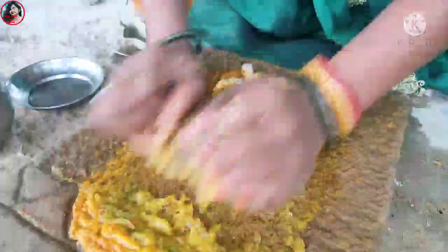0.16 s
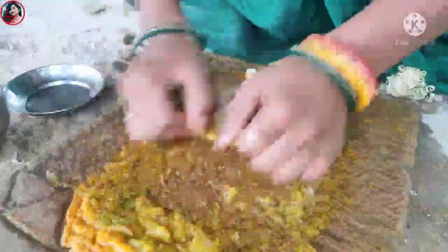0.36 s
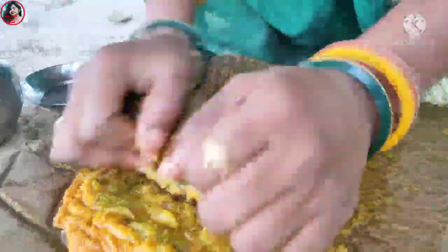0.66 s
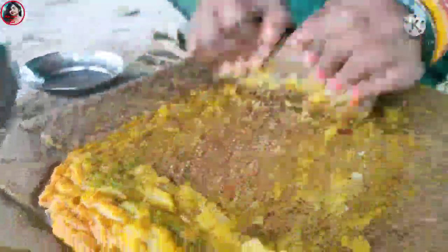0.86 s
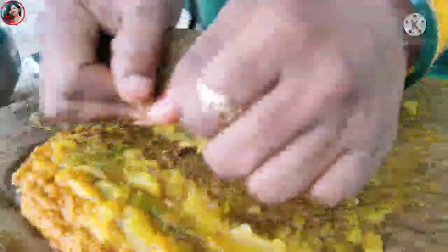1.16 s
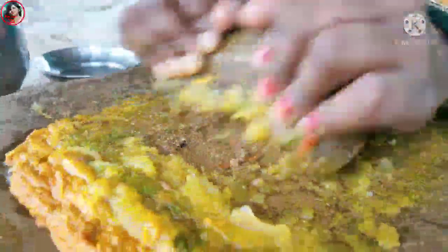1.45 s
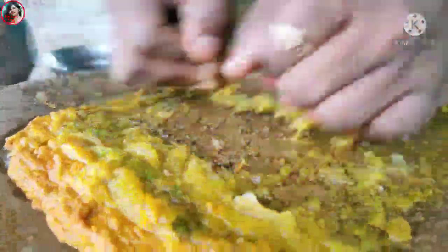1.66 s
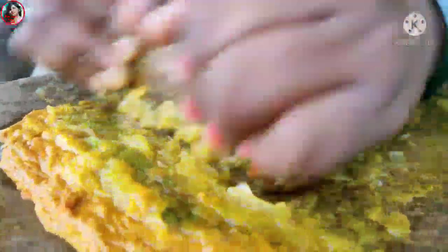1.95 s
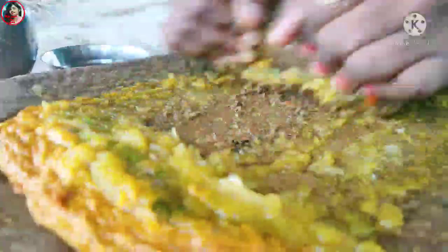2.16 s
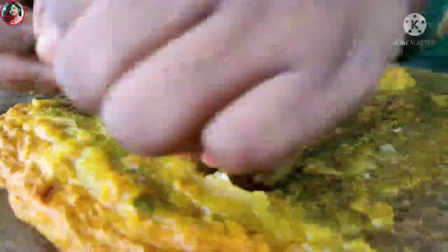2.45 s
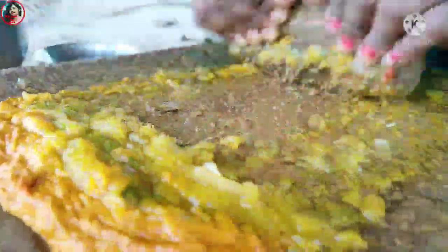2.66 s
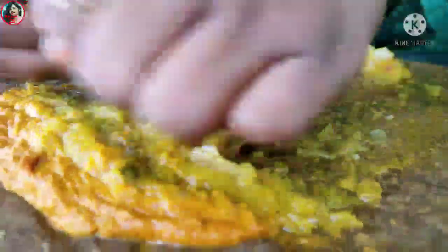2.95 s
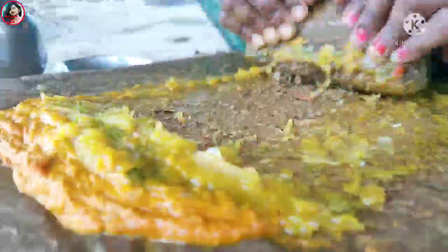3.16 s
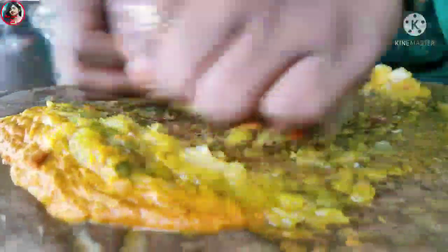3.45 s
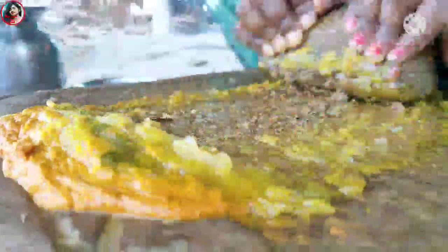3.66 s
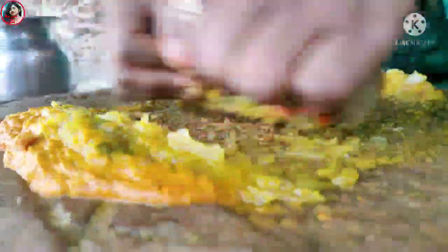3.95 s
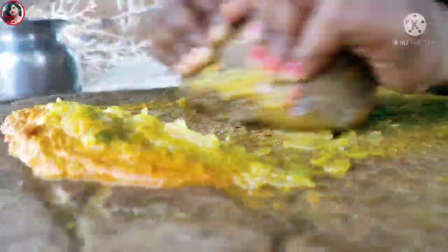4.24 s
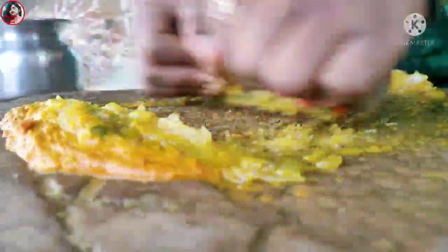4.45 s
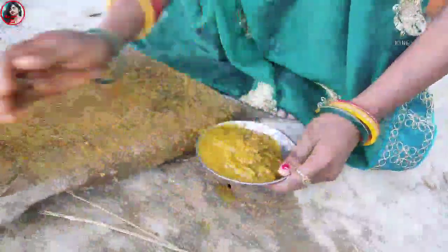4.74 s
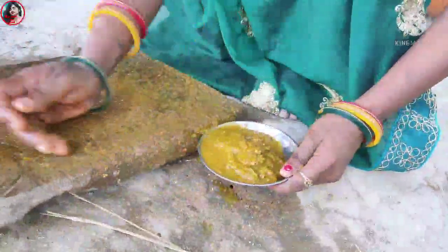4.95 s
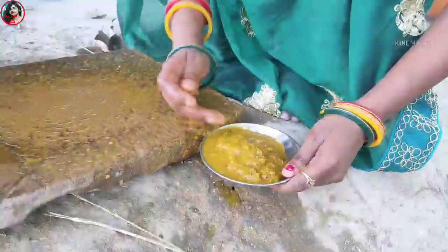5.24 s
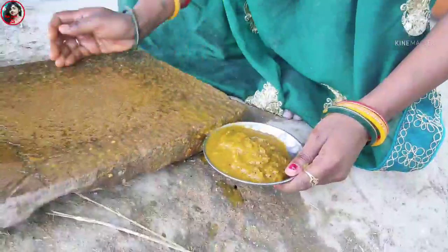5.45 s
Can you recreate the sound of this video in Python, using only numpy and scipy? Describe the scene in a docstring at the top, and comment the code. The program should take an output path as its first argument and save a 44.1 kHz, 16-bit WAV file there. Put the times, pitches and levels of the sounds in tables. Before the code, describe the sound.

From 0 to about 4.75 seconds a stone muller is pushed and pulled over wet spices on a stone slab, close and dry, about two full back-and-forth cycles or four strokes each second. Each stroke swells with low rumble, mid scrape, a short stony ring and bright wet crunch with fizzing paste. Early strokes have more husky crackle; later ones are heavier and scrapier. Seeds snap irregularly, strongly near 1.4, 2.4 and 3.65. Stone knocks stone at 1.7, hardest as a double hit at 2.8, and again at 3.3. Hoarse falling crow caws come from outside at the start, 0.5 to 1.4, 2.7 and 3.4, with open reflections. A far engine thuds softly, about 23 puffs per second, over low yard hush. Grinding cuts off; a soft low bump follows at 4.85, cloth rustles from 5, tiny whistles sound around 5.1 to 5.3, a faint knock at 5.14 and a weak caw at 5.5. Only the right channel sounds.

```python
"""In a house by a yard, a stone muller is pushed and pulled over a slab of wet spices, about twice a second.
Filtered grit follows each stroke as slab rumble, scrape, muller ring and wet crunch; noise bursts snap seeds.
Crows caw outside as hoarse harmonic stacks and a far one-cylinder engine thuds in low puffs over yard hush.
The grinding stops short, leaving a soft bump, rustling cloth, a faint knock and a small bird's whistles."""
import sys
import numpy as np
from scipy import signal
from scipy.fft import rfft, irfft
from scipy.io import wavfile
from scipy.ndimage import uniform_filter1d

SR = 44100
rng = np.random.default_rng(int(sys.argv[2]) if len(sys.argv) > 2 else 0)


def to_wav(s):
    """Save 16-bit WAV."""
    ch = np.atleast_2d(s).T  # columns
    pcm = np.round(np.clip(ch, -1, 1) * 32767)  # PCM
    wavfile.write(sys.argv[1], SR, pcm.astype(np.int16))


N = 247401  # length in samples


def amp(db):
    """Decibels to gain."""
    return 10 ** (np.asarray(db) / 20)


def unit(x):
    """Scales to rms 1."""
    return x / np.sqrt(np.mean(x ** 2) + 1e-20)


def add(mix, s, sound):
    """Mixes a sound in at time s; it may have begun before zero."""
    at = round(s * SR)
    sound = sound[max(-at, 0):]
    part = mix[max(at, 0):][:len(sound)]
    part += sound[:len(part)]


def arch(start_s, length_s, peak_share):
    """Swells from 0 to 1 and back, with its top at the given share of the length."""
    times = start_s + length_s * np.array([0, peak_share, 1])
    return np.sin(np.pi * np.interp(np.arange(N) / SR, times, [0, .5, 0]))


def wander(size, rate_hz):
    """Slow random drift of rms 1, with little movement above the given rate."""
    f = np.fft.rfftfreq(size, 1 / SR)
    spectrum = rfft(rng.standard_normal(size))
    return unit(irfft(spectrum * np.exp(-(f / rate_hz) ** 2), size))


def colour(x, points):
    """Causal (minimum-phase) filter with the given spectrum: it rings only after each click."""
    hz, db = np.transpose(points)
    f = abs(np.fft.fftfreq(4096, 1 / SR))
    log_gain = np.log(amp(np.interp(np.log(f + 1), np.log(hz), db)))
    taps = np.fft.ifft(np.exp(np.conj(signal.hilbert(log_gain)))).real
    return signal.oaconvolve(x, taps[:len(taps) // 2])[:len(x)]


def shifting(x, patchy_db):
    """Random gains, smoothed over time and frequency, make the colour shift in patches."""
    z = signal.stft(x, nperseg=512, noverlap=384)[2]
    patches = rng.standard_normal(z.shape)
    patches = uniform_filter1d(patches, size=5, axis=0)  # across frequency
    patches = uniform_filter1d(patches, size=20, axis=1)  # across time
    return signal.istft(z * amp(patchy_db * unit(patches)), nperseg=512, noverlap=384)[1][:N]


# The muller's pushes and pulls. Each row: start in seconds, length in seconds, share of the length where it is
# fastest, share where the stones bite hardest, then relative levels in dB of rumble, scrape, ring and crunch.
STROKES = [(-0.087, 0.22, 0.58, 0.17, -37.0, -43, -31, -44.5),
           (0.058, 0.26, 0.58, 0.58, -34.0, -40, -27, -35.5),
           (0.273, 0.21, 0.74, 0.67, -34, -40, -30, -45.5),
           (0.408, 0.33, 0.75, 0.72, -41.0, -42.5, -32.5, -35.5),
           (0.71, 0.25, 0.59, 0.45, -36.5, -46, -34, -39), (0.908, 0.29, 0.54, 0.7, -39.0, -50, -32.5, -35),
           (1.17, 0.268, 0.62, 0.52, -31.5, -47, -37, -39),
           (1.396, 0.24, 0.35, 0.48, -34.0, -40.5, -29.5, -29),
           (1.585, 0.25, 0.76, 0.67, -31.5, -41, -33.0, -33.0),
           (1.834, 0.25, 0.38, 0.41, -34, -34.5, -27, -29), (2.056, 0.26, 0.73, 0.53, -30.0, -37, -35, -35),
           (2.281, 0.24, 0.5, 0.45, -28, -30.5, -27.5, -28.5),
           (2.502, 0.27, 0.59, 0.55, -33.5, -45.5, -38.0, -33.0),
           (2.735, 0.25, 0.56, 0.43, -29.5, -32.0, -28.0, -26.5),
           (2.934, 0.3, 0.63, 0.51, -30.0, -37.5, -32, -33),
           (3.187, 0.26, 0.48, 0.57, -29.0, -27.5, -28.5, -28.5),
           (3.415, 0.27, 0.68, 0.55, -27.5, -34, -32.5, -34.0),
           (3.654, 0.28, 0.58, 0.46, -31.5, -32, -31, -33),
           (3.961, 0.25, 0.31, 0.18, -30.0, -38.0, -37.5, -38.0),
           (4.16, 0.26, 0.55, 0.38, -31.0, -31.0, -33, -32.0),
           (4.41, 0.24, 0.57, 0.42, -26, -32.0, -32, -37.5),
           (4.625, 0.18, 0.47, 0.59, -66, -42.5, -48, -44.0)]
# Slab rumble spectrum. Each row: frequency in Hz, relative density in dB per Hz.
RUMBLE = [(20, -18), (42, -34), (75, -16), (110, -4.5), (148, 1.5), (210, -7.5), (280, -17.5), (500, -39)]
# Stone scrape spectrum, also the thud of a knock. Each row: frequency in Hz, relative density in dB per Hz.
SCRAPE = [(120, -33.5), (280, -1.5), (450, 3.5), (720, 3), (900, -8), (1250, -3.5), (1600, -20), (2500, -6),
          (3600, -30), (6000, -37.5)]
# Spice crunch spectrum. Each row: frequency in Hz, relative density in dB per Hz.
CRUNCH = [(300, -30), (1400, -22.5), (2800, -18), (4100, -16.5), (4900, -5.5), (5600, -5.5), (6700, -6),
          (7800, -17.5), (10500, -32), (15500, -41)]
# Breaking husks spectrum. Each row: frequency in Hz, relative density in dB per Hz.
CRACKLE = [(500, -27), (1500, 4.5), (2700, 2.5), (3600, 0), (4400, -9), (5700, 4), (8000, -23),
           (15500, -14)]
# Wet paste fizz spectrum. Each row: frequency in Hz, relative density in dB per Hz.
FIZZ = [(3000, -35.5), (6500, -8), (8000, 2), (10500, -5), (15500, -12)]
# rumble and crunch follow the speed, scrape and ring the bite: (power, relative dB left while the muller turns)
RUMBLE_LAW, SCRAPE_LAW, RING_LAW, CRUNCH_LAW = (2.92, -56), (2.15, -49), (3.4, -59), (2, -58.5)
# the paste gets finer: a coarse-grit boost at the outset and its loss
COARSE_DB, MILLING_DB_PER_S = 12, 2
STOP_S = 4.746  # the grinding is cut off here


def grinding():
    """Each stroke speeds up and slows down, dragging grit between the stones: rumble, scrape, ring and crunch."""
    t = np.arange(N) / SR
    powers, turning_db = np.transpose([RUMBLE_LAW, SCRAPE_LAW, RING_LAW, CRUNCH_LAW])
    energy = np.ones((N, 1)) * amp(turning_db) ** 2
    for start_s, length_s, fastest, hardest, *levels_db in STROKES:
        speed = arch(start_s, length_s, fastest)
        bite = arch(start_s, length_s, hardest)
        moving = speed > 0
        drive = np.transpose([speed[moving], bite[moving], bite[moving], speed[moving]])
        energy[moving] += (amp(levels_db) * drive ** powers) ** 2
    rumble_db, scrape_db, ring_db, crunch_db = 10 * np.log10(energy.T)
    coarse_db = COARSE_DB - MILLING_DB_PER_S * t

    rumble = amp(rumble_db + 0.64) * steadied(colour(grit(300, 3.1, .4), RUMBLE), size=1800)
    grains = grit(1500, 4.6, 0.6)  # the same grains scrape the slab and ring the muller
    scrape = amp(scrape_db - 2.33) * unit(shifting(colour(grains, SCRAPE), patchy_db=3.5))
    ring = amp(ring_db - 2.0) * steadied(muller(grains, damping_db=17.0), size=1500)
    # the crunch is uneven, its colour shifting at random
    pulp = shifting(colour(grit(per_s=2400, spread_db=2.3, hiss=.35), CRUNCH), patchy_db=5)
    crunch = amp(crunch_db + 1.06) * unit(pulp * clumps() * amp(1.4 * wander(N, 110)))
    # coarse husks break one by one
    husks = shifting(colour(grit(900, 1.6, 0.15), CRACKLE), patchy_db=3)
    crackle = amp(crunch_db + coarse_db - 9.5) * unit(husks)
    # bubbles of unequal size burst in the wet paste, in spurts that follow the crunch
    bubbles = shifting(colour(grit(1500, 3.8, 0.34), FIZZ), patchy_db=6.5)
    spurts = bubbles * amp(4.4 * wander(N, 22))
    fizz = amp(0.96 * crunch_db + 0.33 * coarse_db - 12.0) * unit(spurts)

    stop = np.clip((STOP_S - t) * 300, 0, 1)
    return (rumble + scrape + ring + crunch + crackle + fizz) * stop


def grit(per_s, spread_db, hiss):
    """Random fractures of very unequal size over a bed of fine hiss."""
    sizes = amp(spread_db * np.minimum(rng.exponential(1, N), 4.5))
    clicks = sizes * rng.choice([-1, 1], N) * (rng.random(N) < per_s / SR)
    return unit(unit(clicks) + hiss * rng.standard_normal(N))


def steadied(x, size):
    """Evens out a narrow sound's chance swells."""
    evenness = .38
    power = uniform_filter1d(unit(x) ** 2, size)
    return unit(x / (power + .02) ** evenness)


def clumps():
    """Gain that jumps as each small husk bursts, then falls back to the even crunch."""
    husks_per_s, husk_db, decay_s = 45, -1, .0016
    bursts = rng.uniform(0.24, 1.7, N) * (rng.random(N) < husks_per_s / SR)
    return 1 + amp(husk_db) * signal.lfilter([1], [1, -np.exp(-1 / (decay_s * SR))], bursts)


# Modes of the stone muller. Each row: frequency in Hz, undamped level in dB, time to fall 60 dB in seconds.
MULLER = [(822, -4, 0.058), (1067, 7, 0.12), (1120.3, 11.5, 0.065), (1897, -10, 0.095), (2200, -16.5, .04),
          (2627, 9.5, 0.21)]


def muller(x, damping_db):
    """The stone roller rings; paste under it deadens modes, per octave away from its main bending mode."""
    t = np.arange(SR // 5) / SR
    main_hz = MULLER[1][0]
    ring = np.zeros(len(t))
    for hz, db, t60 in MULLER:
        level = amp(db - damping_db * abs(np.log2(hz / main_hz)))
        ring += level * np.exp(-np.log(1000) * t / t60) * np.sin(2 * np.pi * hz * t)
    return signal.oaconvolve(x, ring)[:len(x)]


# Seeds snapping. Each row: time in seconds, relative level of the snap in dB, length of the crumbling in
# seconds, relative level of the high splinter in dB.
SNAPS = [(0.064, -15.5, 0.0055, -34.5), (0.2982, -20, 0.0028, -23.5), (0.484, -20.5, 0.005, -37),
         (0.7196, -26.5, 0.005, -43), (0.7285, -24.5, 0.0022, -38), (0.934, -20, 0.0055, -27),
         (1.3865, -19.5, 0.0023, -45), (1.425, -12, 0.0072, -39), (1.5742, -23, 0.0055, -27),
         (1.8204, -16.5, 0.013, -32), (1.864, -19, 0.0026, -33), (2.05, -25.5, 0.0024, -38),
         (2.152, -22.5, 0.0055, -33), (2.318, -23.5, 0.0068, -49), (2.381, -11.5, 0.011, -30),
         (2.5522, -25.5, 0.0077, -56), (2.607, -35, 0.0079, -31), (2.7256, -14, 0.015, -43),
         (2.9408, -17, 0.0047, -29), (2.946, -19.5, 0.0018, -42), (3.178, -20, 0.0068, -46),
         (3.225, -18.5, 0.0024, -43), (3.6541, -6.5, 0.0069, -42), (3.716, -21, 0.0014, -32.5),
         (3.895, -25, 0.0033, -57), (4.132, -19, 0.015, -33), (4.1506, -19.5, 0.0016, -48),
         (4.1822, -21, 0.0082, -38), (4.242, -18, 0.0023, -48.5), (4.3734, -15, 0.0034, -31),
         (4.6332, -16.5, 0.0066, -32), (4.6413, -20.5, 0.0035, -49)]
# Body of a snap. Each row: frequency in Hz, relative density in dB per Hz.
SNAP = [(100, -11), (700, -9), (1100, -5.5), (1700, -12.5), (3000, -8), (4200, -6.5), (5600, 4.5),
        (7000, -5), (8500, -17), (15500, -27.5)]
# High splinter of a snap. Each row: frequency in Hz, relative density in dB per Hz.
SPLINTER = [(4000, -39), (7500, 2.5), (9500, 9), (15500, -3.5)]


def snaps():
    """A seed creaks briefly, splits with one crack, then crumbles for a few milliseconds."""
    creak_share, crumb_share = .25, .4  # creak against crumbling, crumbling against crack
    out, t = np.zeros(N), np.arange(-SR // 200, SR // 16) / SR
    for s, db, crumble_s, splinter_db in SNAPS:
        crumbs = rng.standard_normal(len(t)) * np.sqrt(rng.exponential(1, len(t)))
        crack = rng.standard_normal(len(t)) * np.exp(-abs(t) / 0.00053) * (t >= 0)
        creak = creak_share * np.exp(-abs(t) / 0.0026)
        giving = np.where(t < 0, creak, np.exp(-(t / crumble_s) ** 2))
        force = crack + crumb_share * crumbs * giving
        burst, splinter = colour(force, SNAP), colour(force, SPLINTER)
        add(out, s + t[0], amp(db + 15) * burst / np.linalg.norm(burst))
        add(out, s + t[0], amp(splinter_db + 17.5) * splinter / np.linalg.norm(splinter))
    return out


# Stone striking bare stone. Each row: time in seconds, relative peak in dB, decay of the chatter in seconds.
KNOCKS = [(0.386, -22, 0.0051), (1.700, -18.5, 0.013), (2.607, -25, 0.0029), (2.800, -7.5, 0.012),
          (2.812, -6.5, 0.0043), (3.323, -14.5, 0.0086), (4.472, -28.5, 0.0046), (4.635, -28, 0.002),
          (5.139, -41, .001)]


def knocks():
    """The muller drops through the paste and chatters on the slab, in step with its strongest mode."""
    out, t = np.zeros(N), np.arange(SR // 5) / SR
    for s, db, chatter_s in KNOCKS:
        dying = np.exp(-t / chatter_s)
        chatter = 0.0099 * np.cos(2 * np.pi * MULLER[2][0] * t)
        blows = (0.06 * rng.standard_normal(len(t)) + chatter) * dying
        blows[0] += 1  # first contact
        # a light knock stays cushioned by paste; a hard one frees the high modes
        ring = muller(blows, damping_db=max(-.6 * (db - 2), 0))
        thud = colour(rng.standard_normal(len(t)) * dying * (1 - np.exp(-t / .002)), SCRAPE)
        sound = unit(ring) + amp(-23.5) * unit(thud)
        add(out, s, amp(db) * sound / abs(sound).max())
    return out


def bump():
    """A soft bump after the grinding: one short, wavering low hum."""
    return tone(4.85, .17, hz=99, db=-35, waver=0.082, waver_hz=40)


def tone(start_s, length_s, hz, db, waver, waver_hz):
    """A wavering whistle or hum that swells and dies away."""
    pitch = hz * (1 + waver * wander(N, waver_hz))
    wave = unit(np.sin(2 * np.pi * np.cumsum(pitch) / SR))
    return amp(db) * arch(start_s, length_s, 0.44) ** 1.16 * wave


# Cloth stirring as an arm moves. Each row: start in seconds, length in seconds, relative level in dB.
CLOTH = [(4.958, 0.19, -54.5), (5.106, 0.19, -51), (5.2, 0.36, -62), (5.553, 0.15, -55)]
# Cloth spectrum. Each row: frequency in Hz, relative density in dB per Hz.
RUSTLE = [(200, -3), (550, 5), (800, -5), (1200, 2), (1700, -6.5), (3000, -18.5), (4300, -30), (5800, -10),
          (7500, -19), (11000, -38), (15500, -28)]


def cloth():
    """Each move of the arm is one swell of rustling."""
    stirring = sum(amp(db) * arch(start_s, length_s, peak_share=0.28) ** 1.44
                   for start_s, length_s, db in CLOTH)
    return stirring * unit(shifting(colour(rng.standard_normal(N), RUSTLE), patchy_db=7.0))


# Caws. Each row: start in seconds, length in seconds, top pitch in Hz, sag of the pitch in Hz per second,
# relative level in dB, roughness from 0 to 1, second partial in dB.
CAWS = [(-0.08, 0.46, 582, 240, -28.5, 0.51, -19), (0.488, 0.24, 522.6, 280, -32, 0.27, -1),
        (0.628, 0.23, 487, 480, -32, 0.37, -16), (0.848, 0.16, 518, 30, -41, 0.4, -23),
        (1.13, 0.35, 520, 80.8, -34.5, 0.7, -20), (1.523, 0.22, 521, 400, -45.5, 0.53, -32.5),
        (1.972, 0.17, 534, 15, -42, 0.52, -10), (2.717, 0.51, 649, 180, -31.5, 0.58, -8.5),
        (3.42, 0.24, 577, 440, -34.5, 0.48, -9), (3.666, 0.47, 551, 115, -44.5, 0.48, -16.5),
        (5.492, 0.23, 505, 240, -52, 0.36, -11)]
# A crow's throat; the half multiple comes from alternating strong and weak pulses.
# Each row: multiple of the pitch, relative level in dB.
CROW_THROAT = [(1, -26), (2.5, -14.5), (3, 0), (4, -16), (5, -30.5)]
# Sidebands of a hoarse caw. Each row: offset from each partial in Hz, relative level in dB.
FLUTTER = [(-215, -3), (-94.5, 4.5), (104, -2.5), (242.5, -3)]
# every caw scoops up to its top pitch (scoop as a share of it), then sags and fades
CAW_RISE_S, CAW_SCOOP, CAW_ATTACK_S, CAW_RELEASE_S, CAW_FADE_DB = .07, .06, 0.039, 0.062, -3.5


def crows():
    """Hoarse falling caws: a harmonic stack, strongest on its third partial, torn by an uneven flutter."""
    out = np.zeros(N)
    for start_s, length_s, top_hz, sag_hz_per_s, db, rough, second_db in CAWS:
        t = np.arange(0, length_s, 1 / SR)
        scoop = 1 - CAW_SCOOP * np.maximum(1 - t / CAW_RISE_S, 0)
        hz = top_hz * scoop - sag_hz_per_s * np.maximum(t - CAW_RISE_S, 0)
        swell = np.minimum(t / CAW_ATTACK_S, 1) * np.minimum((length_s - t) / CAW_RELEASE_S, 1)
        swell = swell * amp(CAW_FADE_DB * t / length_s)
        phase = 2 * np.pi * np.cumsum(hz * (1 + 0.022 * rough * wander(len(t), 60))) / SR
        # fuzzy sidebands on both sides of each partial, the nearest lower one strongest
        rasp = 0
        for offset_hz, side_db in FLUTTER:
            fuzz = wander(len(t), 26) + 1j * wander(len(t), 22)
            rasp = rasp + amp(side_db) * fuzz * np.exp(2j * np.pi * offset_hz * t)
        # multiples are snapped to the nearest half
        stack = sum(amp(k_db) * np.exp(.5j * round(2 * k) * phase)
                    for k, k_db in CROW_THROAT + [(2, second_db)])
        voice = (stack * (1 + rough ** 2 * rasp)).imag
        add(out, start_s, amp(db + 1.05) * swell * unit(voice))
    return out


# A small bird's whistles. Each row: start in seconds, length in seconds, pitch in Hz, relative level in dB.
CHIRPS = [(5.097, 0.072, 3570, -62), (5.16, 0.08, 3560, -59.5), (5.206, 0.076, 3550, -54.5),
          (5.248, 0.073, 3650, -72)]


def small_bird():
    """Short overlapping whistles, each a sine with a fast random waver of pitch."""
    return sum(tone(*row, waver=0.021, waver_hz=198) for row in CHIRPS)


def walls(x, t60):
    """Scattered reflections off the house walls, falling 60 dB in t60 seconds."""
    t = np.arange(SR // 2) / SR
    taps = rng.standard_normal(len(t)) * (rng.random(len(t)) < 2000 / SR)
    taps = taps * (t > .005) * np.exp(-np.log(1000) * t / t60)
    return signal.oaconvolve(x, taps / np.linalg.norm(taps))[:N]


# The far engine's loudness. Each row: time in seconds, relative level in dB.
ENGINE = [(0, -51), (4.7, -44), (4.799, -52), (5, -43), (5.6, -42)]


def engine():
    """Each firing is a short low exhaust puff with a weaker, duller echo."""
    first_s, period_s, jitter_s = .0118, .04372, .0006
    out, t = np.zeros(N), np.arange(-SR // 50, SR // 18) / SR
    for s in np.arange(first_s, N / SR, period_s):
        size, shift, pitch = rng.standard_normal(3)
        puff = -np.cos(2 * np.pi * 162 * (1 + .04 * pitch) * t) * np.exp(-(t / 0.0049) ** 2)
        echo = np.cos(2 * np.pi * 128 * (1 + 0.13 * size) * t) * np.exp(-((t - .016) / 0.017) ** 2)
        add(out, s + t[0] + jitter_s * shift, amp(1.2 * size) * (puff + 0.48 * echo))
    level_db = np.interp(np.arange(N) / SR, *np.transpose(ENGINE))
    return amp(level_db) * unit(out)


# Hush of the yard. Each row: frequency in Hz, relative density in dB per Hz.
YARD = [(20, -13), (45, 3.5), (100, 6), (220, -1.5), (350, -14.5), (600, -17), (1200, -40.5), (2000, -39),
        (4000, -40.5), (9000, -54), (16000, -58)]


def yard():
    """Steady, mostly low noise whose level drifts gently."""
    return amp(-52) * unit(colour(rng.standard_normal(N), YARD)) * amp(1.5 * wander(N, 4))


def scene():
    """Close stones, far birds and engine, cloth and the hush of the yard; only the right channel is live."""
    stones = grinding() + snaps() + knocks()
    birds = crows() + small_bird()
    near = stones + amp(-16.5) * walls(stones, t60=0.013) + cloth() + bump()
    far = birds + amp(-4.5) * walls(birds, t60=0.55) + engine() + yard()
    return np.array([np.zeros(N), 2 * (near + far)])


def record(dry):
    """Full-scale limit, then the band limit."""
    edge_hz = 15900
    low_pass = signal.firwin(511, edge_hz, window=("kaiser", 9), fs=SR)
    return signal.oaconvolve(np.clip(dry, -1, 1), low_pass[None], "same")


dry = scene()
out = record(dry)
to_wav(out)
```